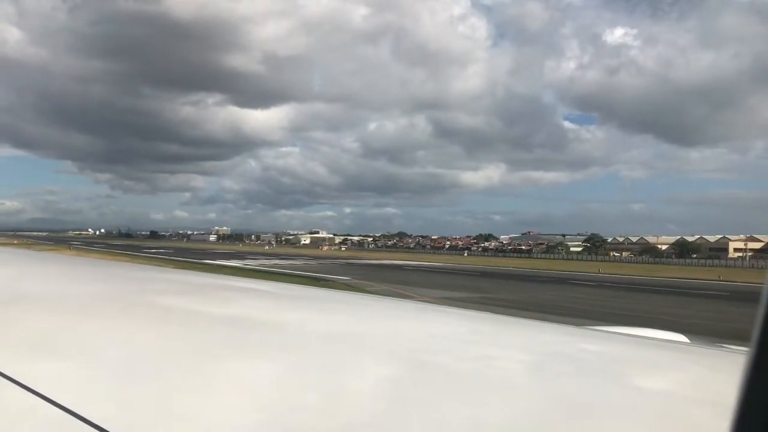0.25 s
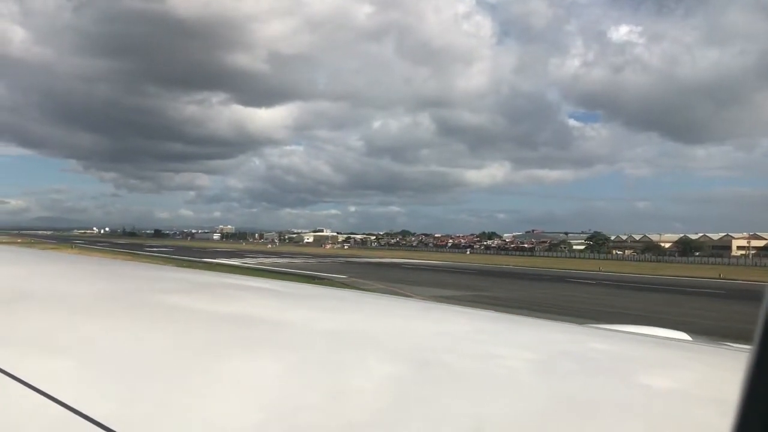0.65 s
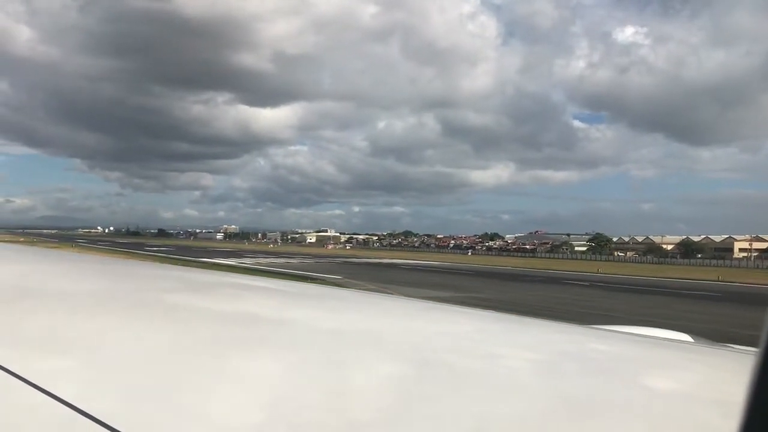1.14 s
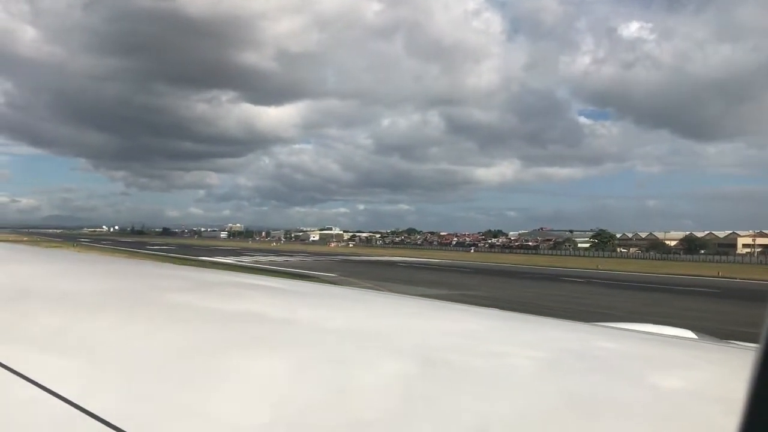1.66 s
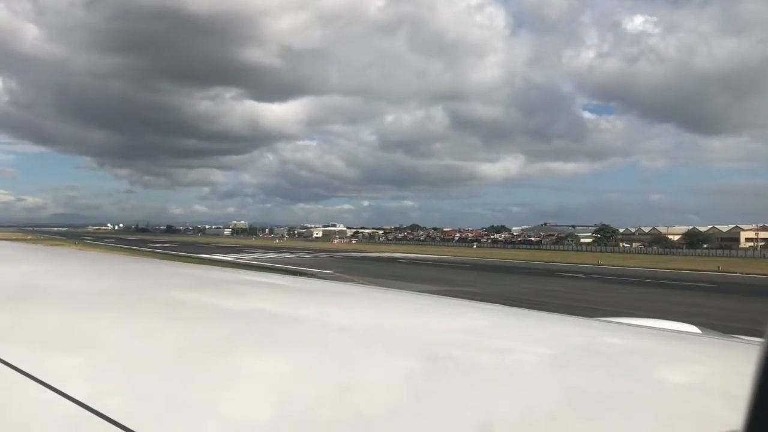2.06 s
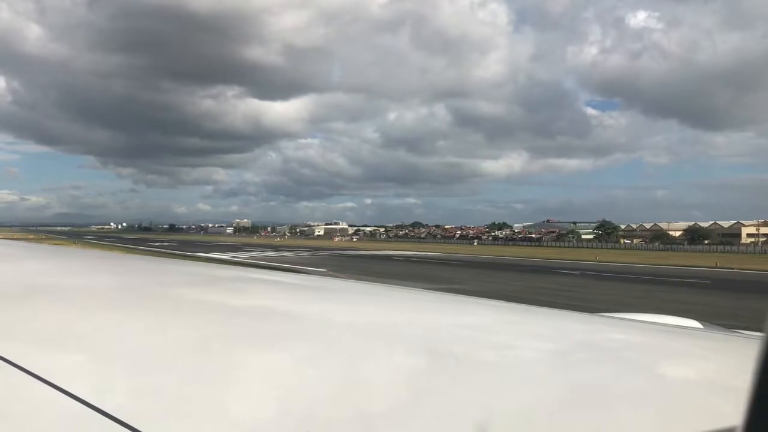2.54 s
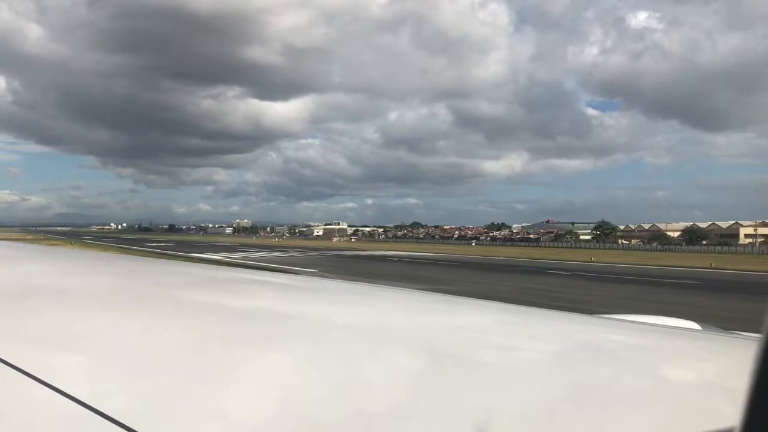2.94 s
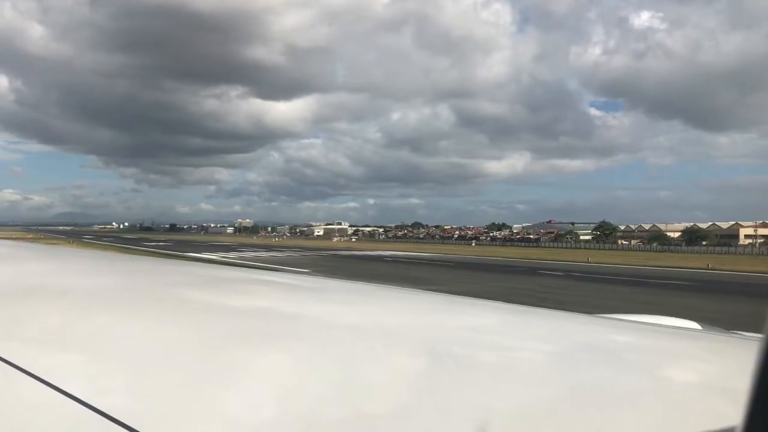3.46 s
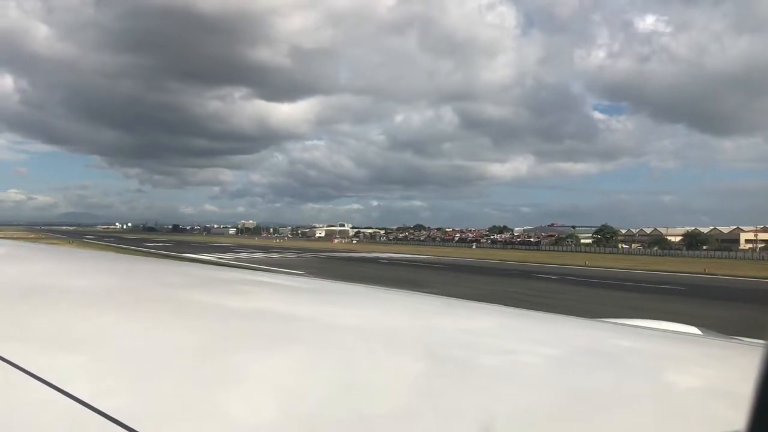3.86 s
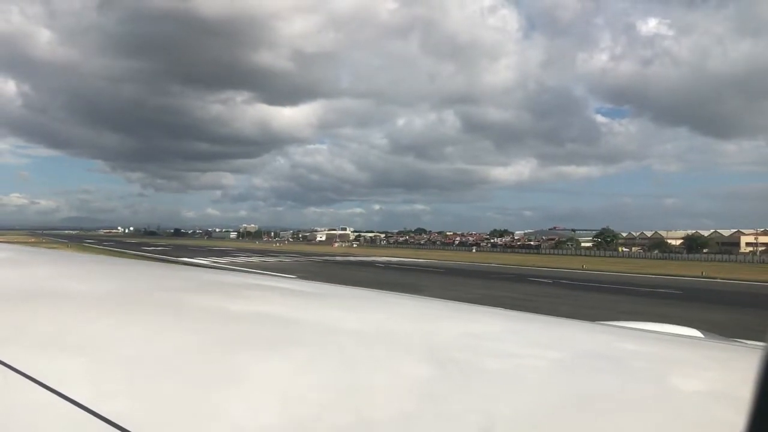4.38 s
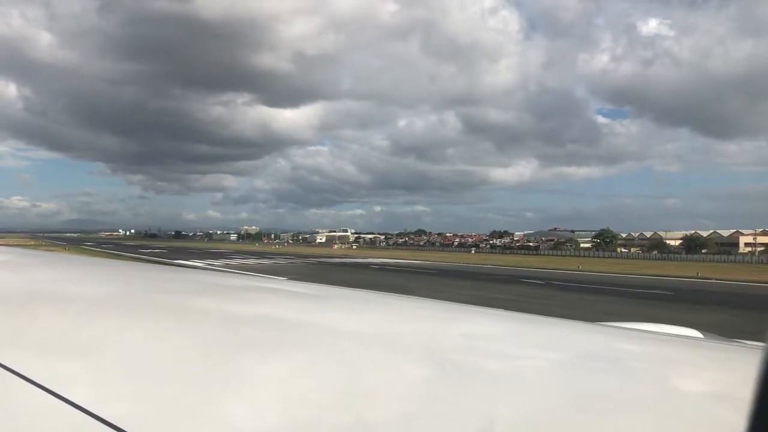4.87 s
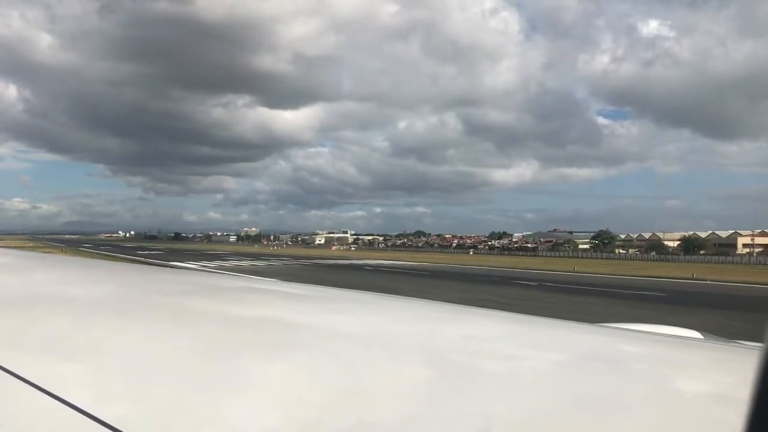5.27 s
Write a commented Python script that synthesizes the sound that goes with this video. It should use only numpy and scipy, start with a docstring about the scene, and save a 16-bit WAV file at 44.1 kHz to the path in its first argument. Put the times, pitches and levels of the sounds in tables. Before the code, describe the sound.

A deep, even rumble and drone fills the cabin of a taxiing airliner, picked up by a phone at the seat. It opens with a quick cluster of muffled wheel bumps and a brief chatter of loose plastic trim. After that the roll is steady, with a few scattered light ticks. Behind it are a soft rush of vent air and a faint engine whine that rises slightly and starts to pulse.

```python
"""The wheels of a taxiing jet airliner rumble through the airframe, heard from a window seat over the wing.
In the first second they bump over pavement joints; inside the cabin, loose trim ticks and rattles.
Outside the window two idling engines whine faintly, creeping up in speed and beating against each other.
Behind it all the air vents rush. The microphone is a phone's, in mono, at the seat."""
import sys
import numpy as np
from scipy import signal
from scipy.fft import rfft, irfft
from scipy.io import wavfile
from scipy.ndimage import uniform_filter1d

SR = 44100
rng = np.random.default_rng(int(sys.argv[2]) if len(sys.argv) > 2 else 0)


def dump(signal):
    """Clip the signal to [-1, 1] and save it as 16-bit WAV at the path in sys.argv[1]."""
    limited = np.clip(np.atleast_2d(signal).T, -1, 1)
    pcm = np.round(limited * 32767).astype(np.int16)
    wavfile.write(sys.argv[1], SR, pcm)


N = 243431
T = np.arange(N) / SR


# The rumble at the seat. Each row: frequency in Hz, relative spectral level in dB.
RUMBLE_SPECTRUM = [(18, -28.5), (30, -25.5), (41, -1), (62, 2), (78, 0), (100, 0), (120, -2), (180, -3.5),
                   (205, -8.5), (250, -14.5), (320, -18), (400, -29.5), (700, -39), (2000, -96)]
# The fuselage around the microphone. Each row: resonance in Hz, width in Hz, rms level in dB.
FUSELAGE_MODES = [(89.87, 5.8, -27.5), (136.8, 7.4, -35.5), (179.1, 10, -40.5)]

def rolling(rumble_db=-23, sway_db=-0.44):
    """Tyres shake the airframe from below; the fuselage drones at a few low resonances."""
    rumble = undb(rumble_db + sway_db * walk(4.2)) * coloured(RUMBLE_SPECTRUM)
    return rumble + ringing_noise(FUSELAGE_MODES)


# Wheels meeting pavement joints. Each row: start in seconds, peak level in dB, pitch as a ratio.
JOINT_BUMPS = [(0.095, -6.5, 1.25), (0.208, -14.5, 1), (0.286, -8, 1.43), (0.334, -4.5, 0.99),
               (0.448, -10.5, 1.1), (0.543, -5.5, 1.095), (.645, -3.5, 1.08), (0.727, -13, 1.065)]
# Modes rung by the landing gear. Each row: frequency in Hz, relative level in dB, time to peak in seconds.
AIRFRAME_MODES = [(50.04, -6.5, 0.036), (64.4, 3.5, 0.022), (87.5, -4.5, 0.023), (126, -14.5, 0.014)]

def bumps():
    """The struts under the cabin soften each blow, so the airframe swells over a few cycles and dies away."""
    out, t = np.zeros(N), T[:SR // 2]
    for start, db, pitch in JOINT_BUMPS:
        thud = np.zeros(len(t))
        for hz, mode_db, peak_s in AIRFRAME_MODES:
            swell = (t / peak_s) ** 2 * np.exp(-2 * t / peak_s)
            thud += undb(mode_db) * swell * np.sin(2 * np.pi * hz * pitch * t)
        add(out, start, undb(db) * thud / np.abs(thud).max())
    return out


# Loose trim in the cabin. Each row: start in seconds, relative level in dB, brightness in dB per octave,
# chatter decay in seconds, number of rebounds.
TRIM_TICKS = [(0.064, -41, 0, 0.0088, 0), (0.0725, -33, -2, 0.016, 3), (0.368, -53, 4, 0.028, 0),
              (0.640, -43.5, 3.5, 0.0099, 0), (0.673, -46.5, 5.5, 0.022, 0),
              (0.7494, -28.5, -2.5, 0.0085, 3), (0.9125, -37, -1, 0.0024, 0), (0.957, -48.5, -2, 0.02, 0),
              (1.692, -43, -4.5, 0.004, 1), (2.161, -45, 3.5, 0.012, 0), (2.38, -37.5, -5, 0.0084, 0),
              (2.527, -46.5, -1, 0.004, 0), (3.04, -46, -3, 0.005, 1), (3.281, -45, -3.5, 0.011, 0),
              (3.948, -51, 3, 0.014, 0), (3.997, -49, 5, 0.006, 0), (4.018, -41, -3, 0.01, 1)]

def trim_ticks(rebound_s=0.0265, rebound_loss_db=8.5, grit=0.32, cabin_db=-17, cabin_decay_s=0.055):
    """A loose piece chatters and falls back at an even pace, ever weaker; the padded cabin adds a tail."""
    out, t = np.zeros(N), T[:8192]
    # lighter contacts favour the panel modes around high_hz
    low_hz, pivot_hz, high_hz = 1300, 3500, 7500
    hz = np.maximum(np.fft.rfftfreq(len(t), 1 / SR), low_hz)
    octaves = np.log2(high_hz / pivot_hz) - np.abs(np.log2(hz / high_hz))
    for start, db, bright_db, decay_s, rebounds in TRIM_TICKS:
        for k in range(round(rebounds) + 1):
            contacts, force, diffuse = rng.standard_normal((3, len(t)))
            chatter = unit(contacts * np.exp(grit * force)) * np.exp(-t / decay_s)
            tail = undb(cabin_db) * diffuse * np.exp(-t / cabin_decay_s)
            colour = undb(db - k * rebound_loss_db + bright_db * octaves)
            add(out, start + k * rebound_s, irfft(rfft(chatter + tail) * colour))
    return out


def trim_rustle(steady_db=-73, stirred_db=-60, stir_s=0.044, settle_s=0.5, flicker_db=2):
    """The trim rustles finely while rolling; each bump stirs it in proportion, and it settles slowly."""
    power = undb(steady_db) ** 2
    for start, db, _ in JOINT_BUMPS:
        age = np.maximum(T - start, 0)
        shaking = undb(stirred_db + db) * (1 - np.exp(-age / stir_s)) * np.exp(-age / settle_s)
        power += shaking ** 2
    return np.sqrt(power) * undb(flicker_db * walk(110)) * rng.standard_normal(N)


# A plastic cabin panel. Each row: resonance in Hz, width in Hz, gain in dB.
PANEL_MODES = [(1588, 266, 6.5), (1920, 280, -0.5), (2070, 460, 2), (2385, 230, -3), (2757, 510, 1),
               (3680, 360, 0.5), (4210, 680, -5), (4600, 810, -10.5), (5790, 1470, -7), (7420, 940, -8.5),
               (8030, 980, -16.5), (8900, 1100, -14), (11700, 800, -32.5), (12700, 900, -15),
               (15000, 3700, -31)]

def trim_panel(contacts, bare_db=-25):
    """The contacts ring a plastic panel; a little of their bare noise reaches the microphone too."""
    ring = sum((-1) ** k * undb(db) * resonate(contacts, hz, width)
               for k, (hz, width, db) in enumerate(PANEL_MODES))
    return ring + undb(bare_db) * contacts


def engines(spool_up_s=0.75, beat_hz=4.7, waver_hz=0.44, flutter_db=0.65):
    """Out on the wings, two fans slightly out of step beat together; the compressor sings above them."""
    # idle holds, then speed rises steadily: the slopes below are in Hz and dB per second
    spooling_s = np.maximum(T - spool_up_s, 0)
    fan_hz, fan_db = 902.2 + 7.4 * spooling_s, -50.5 - 1.17 * spooling_s
    compressor_hz, compressor_db = 1555 + 11.2 * spooling_s, -64 + 0.7 * spooling_s
    second_db = np.minimum(-19 + 5.5 * spooling_s, 0)  # against the first fan, up to equal strength
    first_fan = tone(fan_hz + waver_hz * walk(14))
    second_fan = undb(second_db) * tone(fan_hz + beat_hz + waver_hz * walk(13))
    octave_below = undb(-5 + 2 * walk(14)) * tone(fan_hz / 2 + 3 * walk(25))
    compressor = undb(compressor_db + 2 * walk(9)) * tone(compressor_hz + 1.53 * walk(25))
    return undb(fan_db + flutter_db * walk(16)) * (first_fan + second_fan + octave_below) + compressor


# Vent air as it reaches the seat. Each row: frequency in Hz, relative spectral level in dB.
VENT_SPECTRUM = [(250, 1.5), (550, 1), (800, -3.5), (1400, -5), (1700, -9.5), (2100, -8.5), (2800, -14),
                 (3300, -21.5), (4500, -27), (5000, -29), (6000, -28), (8000, -34.5), (10000, -32.5),
                 (15500, -35.5)]
# Narrow hiss of nozzles and ducts. Each row: centre in Hz, width in Hz, rms level in dB.
NOZZLE_BANDS = [(1283, 89, -62.5), (1916, 43, -69), (11760, 490, -75.5)]

def vents(rush_db=-45, flicker_db=1.0, whistle_hz=9007, whistle_db=-84):
    """Cabin air rushes steadily in the background, with nozzle hiss and one thin high whistle."""
    rush = undb(rush_db + flicker_db * walk(16)) * ducted(coloured(VENT_SPECTRUM))
    hiss = ringing_noise(NOZZLE_BANDS)
    whistle = undb(whistle_db) * tone(whistle_hz + 3 * walk(23))
    return rush + hiss + whistle


def ducted(air, count=24):
    """Many short reflections from duct and cabin walls ripple the spectrum."""
    out = air.copy()
    for lag_s, gain in zip(rng.uniform(.002, .025, count), rng.choice([-.07, .07], count)):
        out += gain * np.roll(air, int(lag_s * SR))
    return unit(out)


def undb(db):
    """Decibels to gain."""
    return 10 ** (np.asarray(db) / 20)


def unit(x):
    """Scale to rms 1."""
    return x / np.sqrt(np.mean(x ** 2))


def walk(rate):
    """Random levels held 1 / rate seconds and smoothed twice; spread near 1."""
    hold = max(int(SR / rate), 2)
    steps = np.repeat(rng.standard_normal(N // hold + 1), hold)
    return 1.42 * uniform_filter1d(uniform_filter1d(steps, hold), hold)[:N]


def coloured(points):
    """Noise of rms 1 with a spectrum of (Hz, dB) points."""
    hz, db = np.transpose(points)
    bin_hz = np.maximum(np.fft.rfftfreq(N, 1 / SR), 1)
    gain = undb(np.interp(np.log(bin_hz), np.log(hz), db))
    return unit(irfft(rfft(rng.standard_normal(N)) * gain, N))


def resonate(x, hz, width):
    """A steep resonance: two passes through one peak filter, gain 1 at its centre."""
    b, a = signal.iirpeak(hz, hz / width, fs=SR)
    return signal.lfilter(b, a, signal.lfilter(b, a, x))


def ringing_noise(modes):
    """Noise held in (Hz, width in Hz, rms dB) resonances."""
    return sum(undb(db) * unit(resonate(rng.standard_normal(N), hz, width)) for hz, width, db in modes)


def tone(hz):
    """A sine of rms 1 that follows a pitch curve."""
    return np.sqrt(2) * np.sin(2 * np.pi * np.cumsum(hz) / SR)


def add(out, start, x):
    """Mix x into out from start seconds on."""
    i = max(int(start * SR), 0)
    out[i:i + len(x)] += x[:N - i]


def scene(trim_db=8):
    """Everything as it reaches the window seat, in one channel."""
    cabin = rolling() + bumps() + engines() + vents()
    trim = trim_panel(trim_rustle() + trim_ticks())
    return (cabin + undb(trim_db) * trim)[None]


def record(dry, bass_hz=32, top_hz=15600):
    """The phone's microphone at the seat loses the deepest bass and cuts the top."""
    lean = signal.sosfilt(signal.butter(3, bass_hz, "high", fs=SR, output="sos"), dry)
    return signal.sosfilt(signal.ellip(10, .2, 70, top_hz, fs=SR, output="sos"), lean)


dry = scene()
out = record(dry)
dump(out)
```